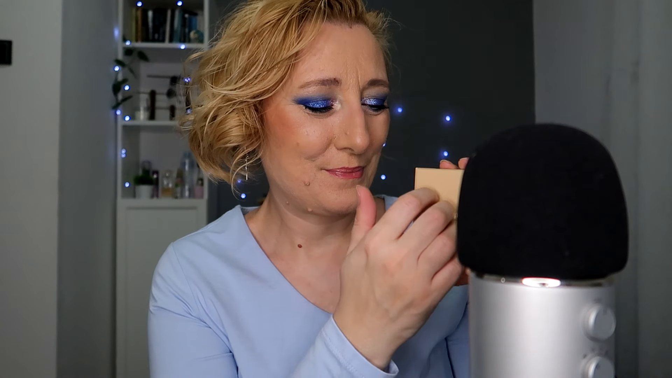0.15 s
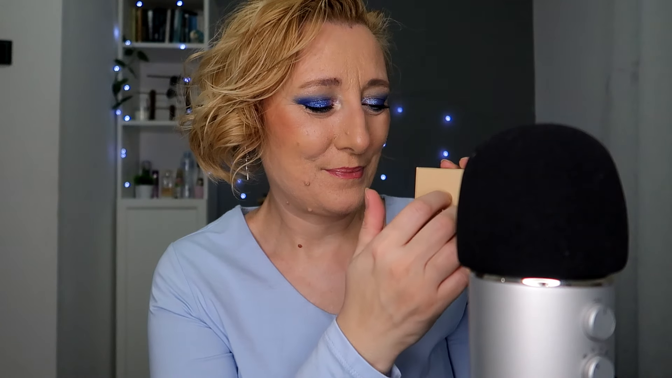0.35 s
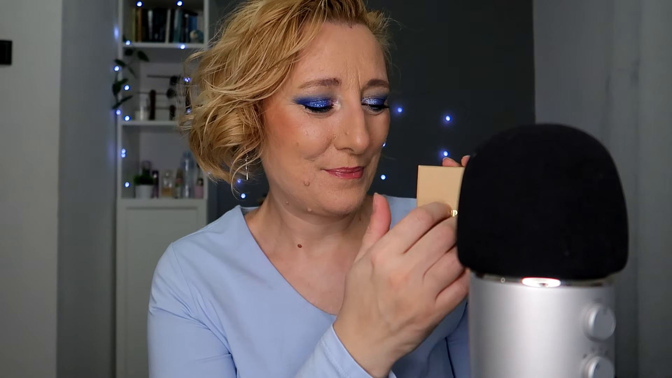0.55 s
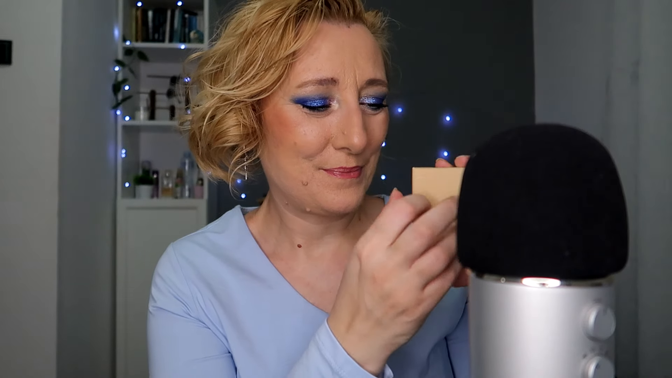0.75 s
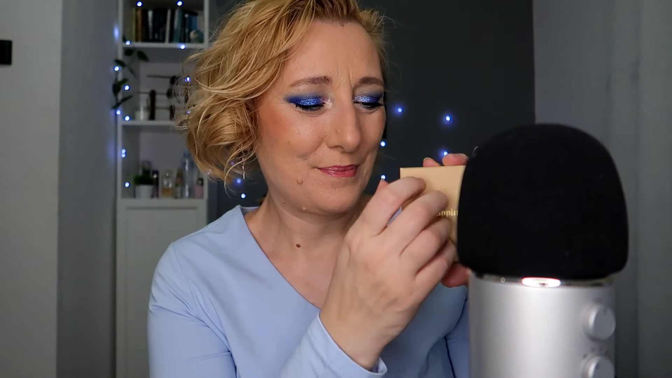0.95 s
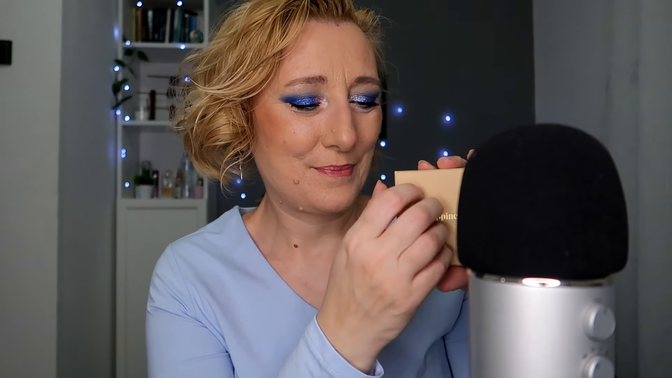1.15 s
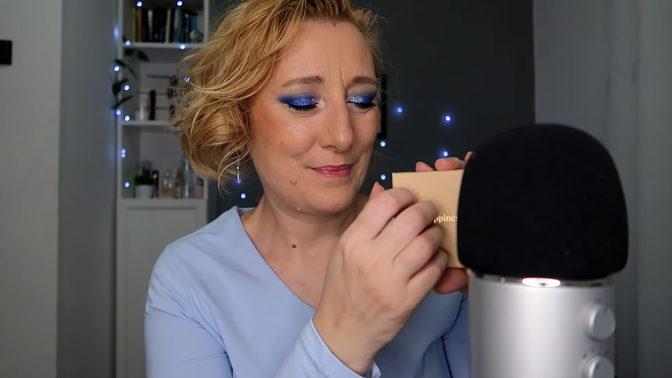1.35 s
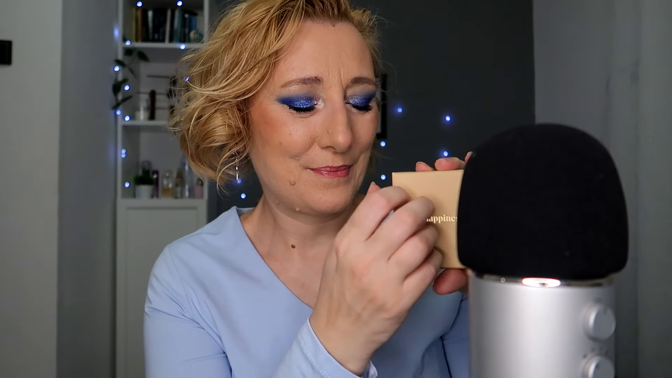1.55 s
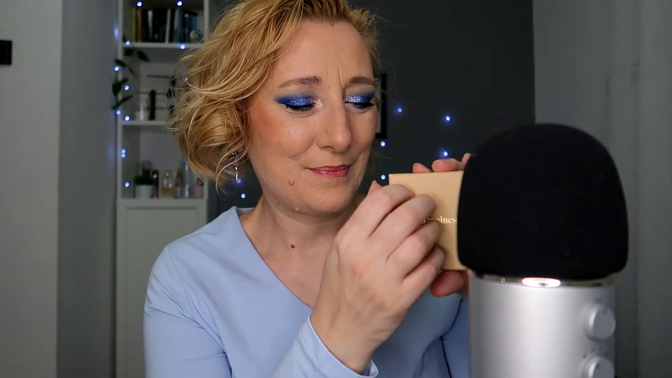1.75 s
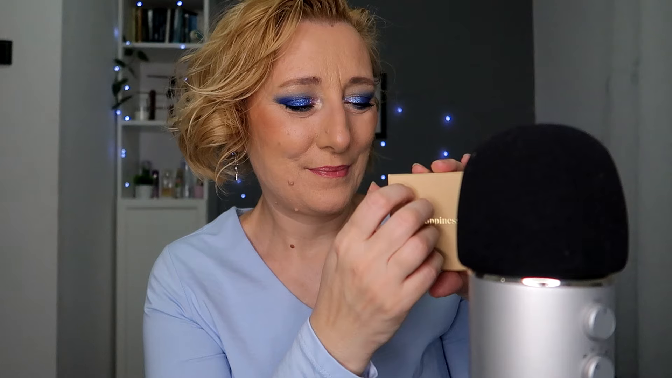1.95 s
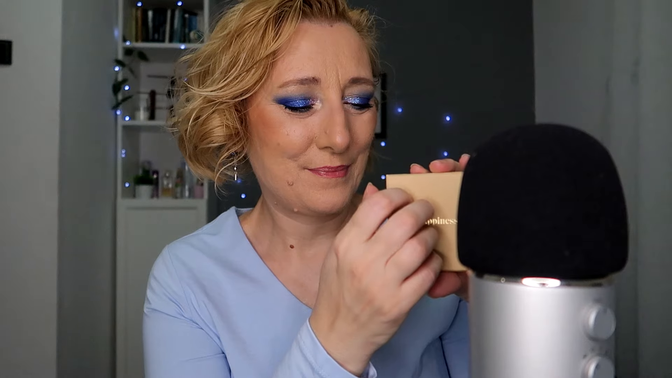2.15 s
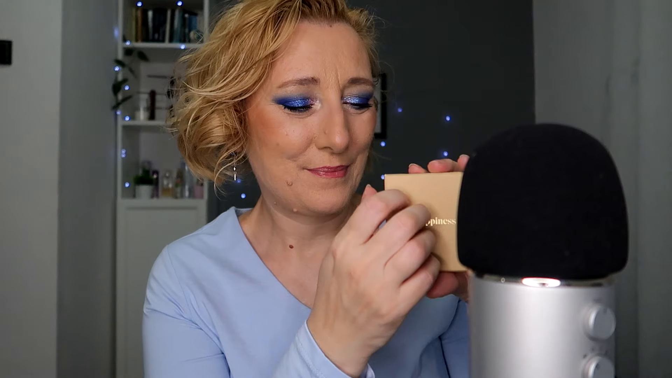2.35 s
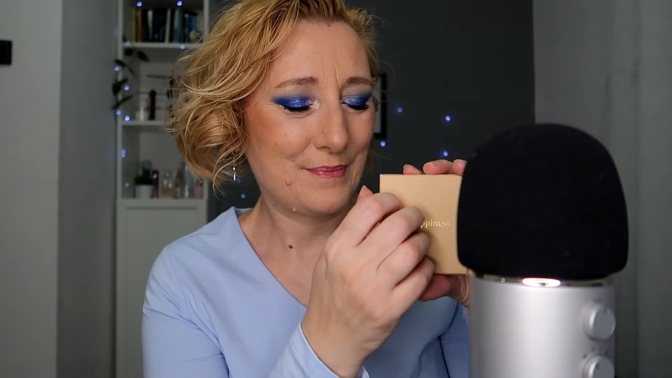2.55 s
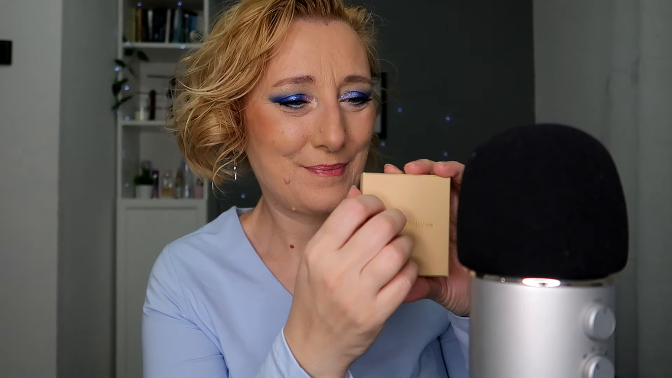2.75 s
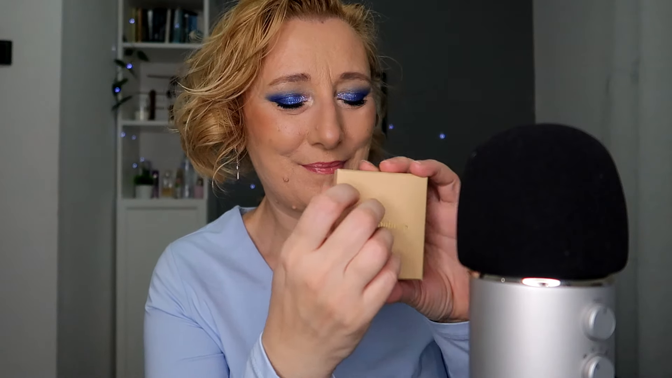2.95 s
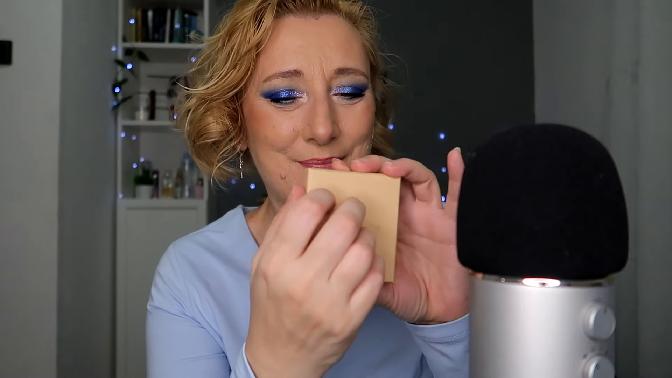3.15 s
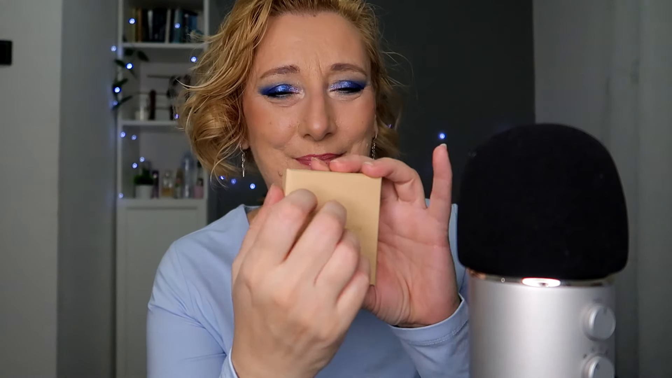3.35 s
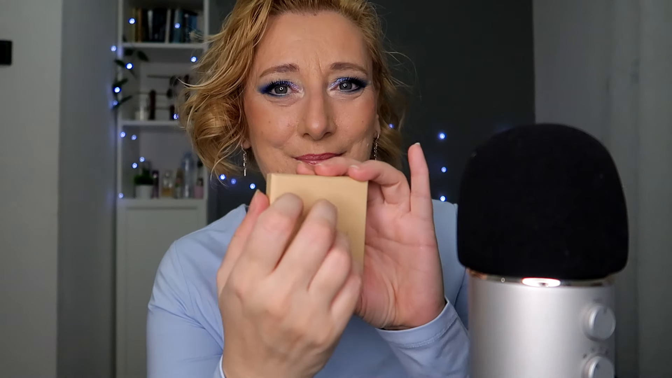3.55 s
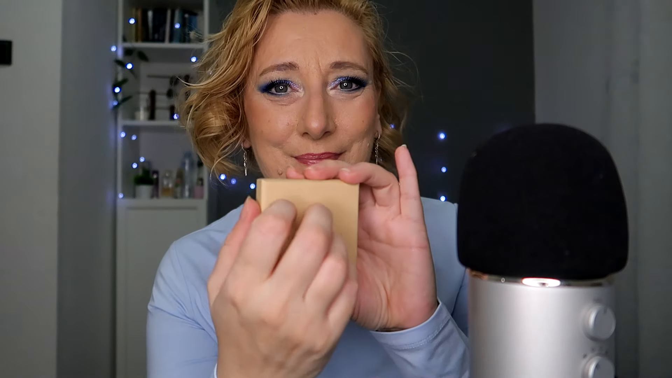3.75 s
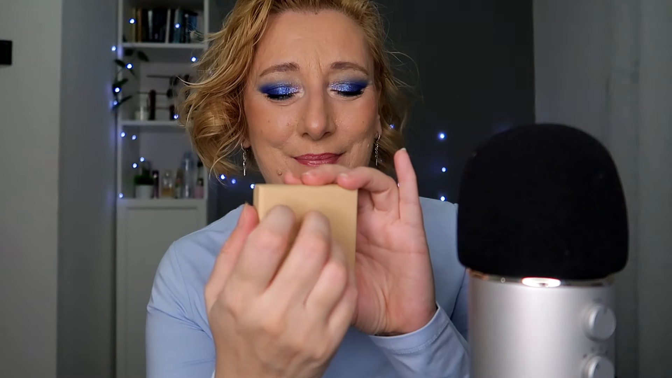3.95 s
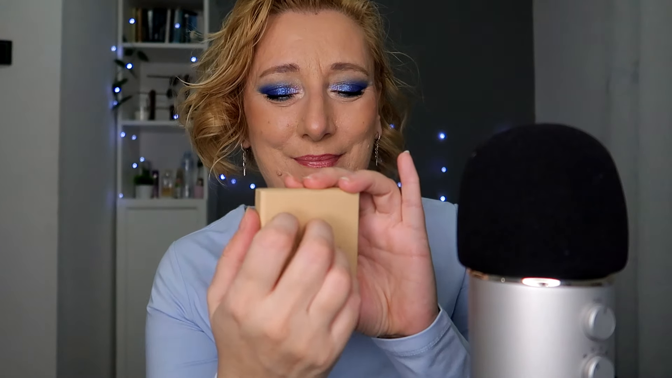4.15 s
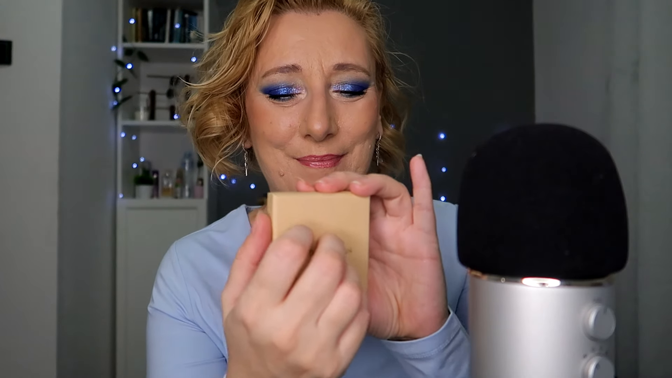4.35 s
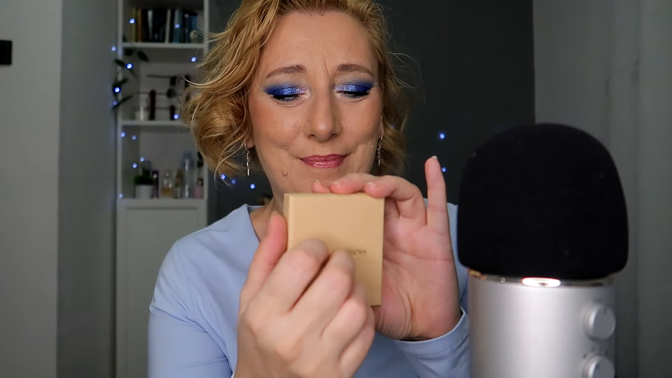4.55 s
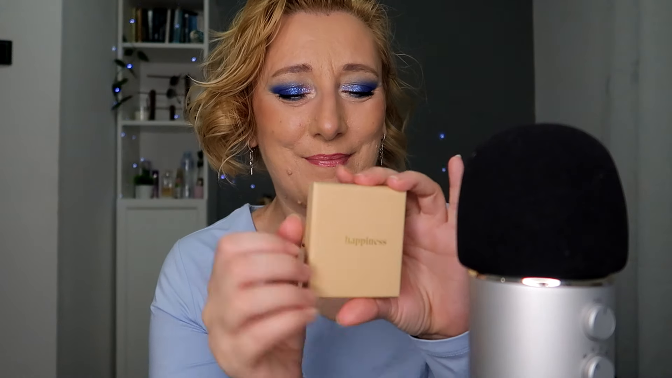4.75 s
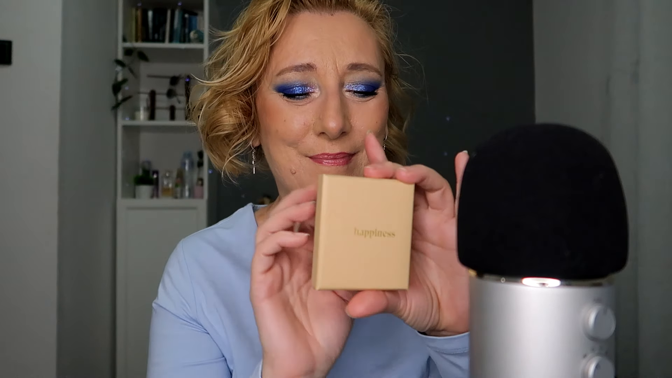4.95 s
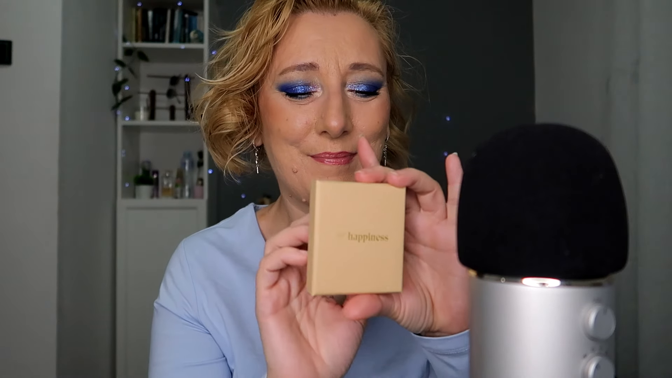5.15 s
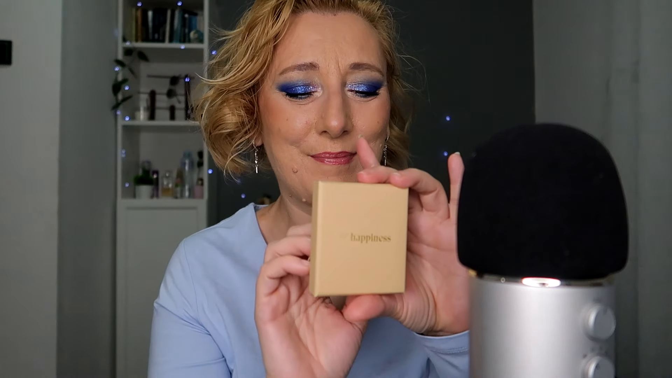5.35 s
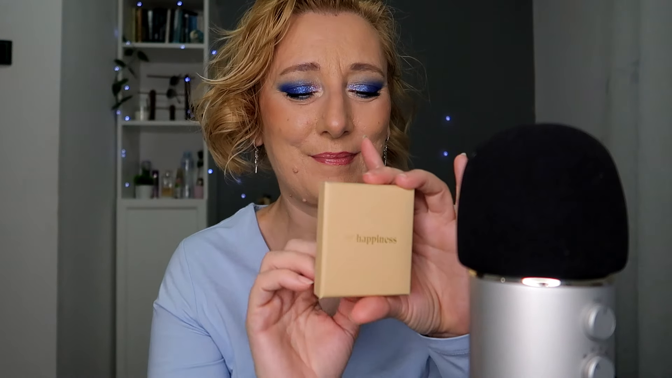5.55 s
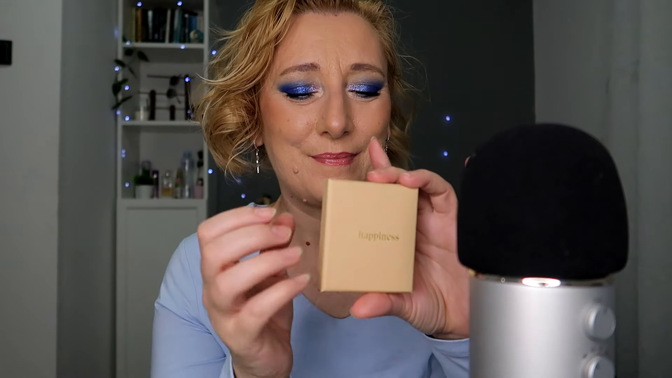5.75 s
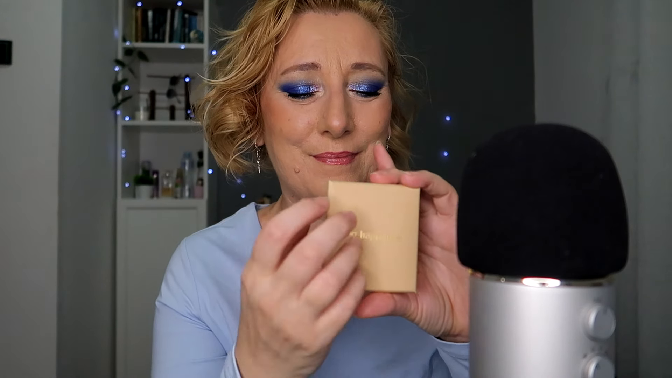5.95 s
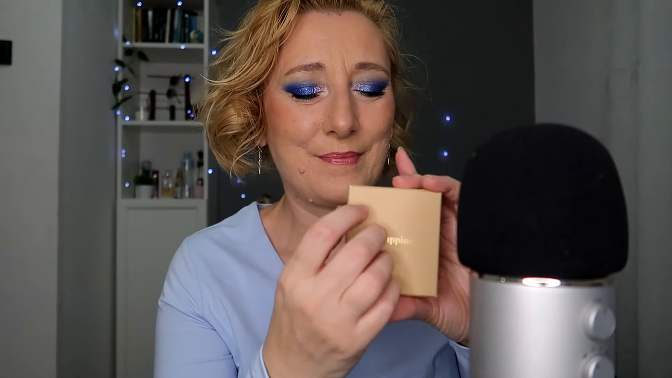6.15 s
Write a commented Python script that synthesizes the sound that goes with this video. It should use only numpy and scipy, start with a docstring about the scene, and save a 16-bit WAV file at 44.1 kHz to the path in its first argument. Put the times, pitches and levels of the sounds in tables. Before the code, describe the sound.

A small cardboard box is played by fingernails very close to a stereo microphone in a quiet, furnished room. From 0 to 0.75 s a dry, grainy scratch sits left of centre, dipping around 0.4 s and swelling near 0.66 s. After a pause, light hollow taps begin at 1.1 s in loose quick pairs, with faint papery brushes between. A sharper tap lands at 1.75 s, more follow to 2.45 s, and the loudest snaps at 2.91 s. Steady irregular tapping runs from 3.1 to 4.13 s, crossing to the right. Raspy scratching fills 4.2 to 4.76 s, with a small snag tick at 4.45 s, then a gap. At 5.13 s a soft low hand bump and weak tap lead into crisp scratching and dull finger rubbing until 5.65 s. After near silence, one hollow tap sounds at 6.05 s with slight brushes. Short echoes and faint room noise remain.

```python
"""Light, hollow taps and dry scratches of fingernails on a small cardboard box, moving from left to right.
Each tap is a blow of damped rings: the lid, a knock, a stiff wall and the nail; the box recoils in the hand.
Scratches, brushes and skids drive lid, walls and nail with a dense stream of random slips; a few snags tick.
Soft low hand bumps and finger rubs join them, with short room echoes and faint room noise behind."""
import sys
import numpy as np
from scipy import signal
from scipy.fft import rfft, irfft, next_fast_len
from scipy.io import wavfile

SR = 44100
rng = np.random.default_rng(int(sys.argv[2]) if len(sys.argv) > 2 else 0)


def generate_wav(sig):
    """Save sig (samples, or channels by samples) to the path in sys.argv[1] as 16-bit PCM at SR."""
    pcm = np.round(np.clip(np.atleast_2d(sig).T, -1, 1) * 32767).astype(np.int16)
    wavfile.write(sys.argv[1], SR, pcm)


N = 274302   # length in samples
AGE = np.arange(4096) / SR   # seconds since a blow

# nail taps: (t/s, lid level/dB, lid f/Hz, knock level/dB re lid, wall level/dB re lid,
#             nail tick level/dB re lid, nail f/Hz, wall f/Hz)
TAPS = [(1.098, -20.1, 851, 4, -4, -46, 8100.0, 2510), (1.1243, -18.5, 830, 1.2, -15.5, 3.5, 3230, 3430),
        (1.2671, -14, 933, 4.5, -2, -21, 4840, 2640), (1.3202, -19, 880, 2, -19, 0.8, 3480, 2840.0),
        (1.7243, -14.2, 810, 5, 3, -34, 8500.0, 2020), (1.7534, -4, 793, -11, -5, -12.5, 5550, 2740),
        (1.893, -12, 776, -0.5, -2.5, -16, 3300, 2130), (1.9196, -11, 896, 6.5, 3.5, -14.8, 5340, 2220.0),
        (2.0432, -21.5, 917, 5, -3, -19, 3060.0, 2500.0),
        (2.1222, -10.5, 785, -1.7, -0.5, -5.9, 4190.0, 3010),
        (2.2527, -18.5, 846, 1, -5, -7.5, 3990.0, 2530), (2.296, -15, 862, 0.2, -7, -15.5, 3860.0, 2500.0),
        (2.3931, -18.5, 920, -0.5, -8, -17, 4800, 1910), (2.4564, -11, 809, 1, -2, -3.5, 3920, 2950),
        (2.914, 0.3, 825, 0.1, -13, -4.5, 3680, 2650), (2.979, -20, 915, 2, -1.5, -15, 4130, 2660.0),
        (3.0923, -9.0, 767, -6, -4, -5, 4160.0, 2860), (3.2734, -5.5, 850, 0, -16.5, -27, 4400, 2940),
        (3.363, -11.5, 890, -1.5, -7.5, -37, 7960, 2810), (3.4384, -11, 807, -3.5, -13, -1, 2960, 2870),
        (3.6086, -7.5, 849, 0.5, -9.5, -8.5, 2970, 2540), (3.687, -13.5, 893, -10, -0.5, -18, 5780.0, 2800),
        (3.7819, -11, 830, -3.5, -2.5, -7.5, 4380, 2850), (3.9235, -13.5, 818, 0, -26, -46, 7900, 2880.0),
        (3.9644, -9.5, 862, -1.5, -8, -9, 3700, 2860.0), (4.043, -19.8, 900, 3, 1.9, -19, 4420.0, 2820.0),
        (4.1314, -13, 898, 0.5, -36, 7, 2900, 2850), (5.1332, -18.5, 894, -21, -6.5, -20, 3560, 2940.0),
        (5.3999, -20.5, 943, 10, -9.5, -35, 6750.0, 3150.0), (6.0523, -11, 759, 5.5, -2, -4.5, 3890, 1873)]
# where the nails play: (t/s, favoured lid f/Hz, left over right level/dB, hollow box rub level/dB re lid)
PLACE = [(0, 790, 4.5, -11), (0.552, 986, 5, -14.5), (1.6, 811, 3, -15), (2.72, 966, 2, -13),
         (3.099, 784, -2.5, -16), (3.6, 851, -6.5, -18), (4.45, 1028, -5.5, -12), (5.3, 1050, -2, -18),
         (6.22, 790, -2, -13)]
# the lower and the upper lid mode: (f/Hz, width/Hz)
LID_LOW = (846, 110)
LID_HIGH = (1033, 120)
# upper mode in a tap: level when the lid is struck at the lower mode's pitch, and growth on stiffer, higher spots
UPPER_MODE_DB, UPPER_MODE_DB_PER_HZ = -12.5, 0.1346
# the box pushed against the hand, re lid; both parts grow slightly with the lid pitch
SHOVE_DB, RECOIL_DB, SHOVE_DB_PER_HZ = -15, -13.5, 0.0012


def taps():
    """A nail dents the card: knock, lid, wall and nail ring as damped modes, and the box is shoved at the hand."""
    out = np.zeros((2, N))
    place_s, _, place_db, _ = np.transpose(PLACE)
    for s, level_db, lid_hz, knock_db, wall_db, tick_db, nail_hz, wall_hz in TAPS:
        stiffer_hz = lid_hz - LID_LOW[0]
        upper_db = UPPER_MODE_DB + UPPER_MODE_DB_PER_HZ * stiffer_hz
        push_db = SHOVE_DB_PER_HZ * stiffer_hz

        lid = ring(lid_hz, width_hz=138) + from_db(upper_db) * ring(*LID_HIGH)
        lid = cut(lid, hz=207, kind="high", order=1)
        shove = from_db(SHOVE_DB + push_db) * ring(hz=544, width_hz=190)
        body = cut(lid + shove, hz=4400, kind="low")

        # the held box recoils slowly, further to the right than the tap
        recoil = cut(ring(hz=108, width_hz=200), hz=61, kind="high")
        recoil = from_db(RECOIL_DB + push_db) * recoil * panned(pan_db=-13.5)
        knock = from_db(knock_db) * ring(hz=1660, width_hz=1210)
        wall = from_db(wall_db) * ring(wall_hz, width_hz=685)

        # one sharp spike and a brief ring
        nail = 1.8 * (AGE == 0) + ring(nail_hz, width_hz=1300, wave=np.cos)
        # the nail flexes and touches again within a millisecond, notching the tick
        nail = nail + 0.13 * np.roll(nail, round(0.0004 * SR))
        nail = cut(nail, hz=2770, kind="high", order=1)
        # the higher the nail's pitch, the further up its tick reaches
        tick = from_db(tick_db) * cut(nail, nail_hz ** 2 / 2900, "low", order=4)

        blow = scattered(body - knock + wall + tick, above_hz=1600, share_db=-4.5)
        pan = panned(np.interp(s, place_s, place_db))
        add(out, s, -from_db(level_db) * (blow + recoil) * pan)
    return out


def scattered(blow, above_hz, share_db):
    """The treble of a blow scatters briefly through the card, differently to each port."""
    tails = rng.standard_normal((2, len(AGE))) * np.exp(-AGE / 0.0031)
    tails /= np.linalg.norm(tails, axis=1, keepdims=True)
    treble = cut(blow, above_hz, "high")
    return blow + from_db(share_db) * signal.fftconvolve(treble[None], tails, axes=-1)[:, :len(AGE)]


# resonances of the box walls: (f/Hz, width/Hz, level/dB)
WALLS = [(1220, 500, 8), (1416, 140, 7.5), (1820, 1500, -9.5)]
# resonances of the nail on the card: (f/Hz, width/Hz, level/dB)
NAIL = [(4030, 740, -2), (5150, 1600, 8.5), (6400, 400, -9), (7800, 780, -4.5), (8900, 200, -8.5),
        (12600, 1800, -6.5)]
# the grip of the holding hand tunes one wall: (t/s, wall f/Hz, its ring level/dB re rasp)
GRIP = [(0.2, 2040, -4), (0.3, 3130, -7), (0.72, 2097, -12), (1.1, 2425, -6), (2.722, 2263, -8.5),
        (4.281, 2790, -5.5), (4.55, 2170, -14), (5.2, 2123, -11.5)]
# the nail's angle sets its free edge and its top: (t/s, edge f/Hz, ring level/dB re hiss, top modes gain/dB)
TILT = [(0.1, 5030, -14, 0), (0.55, 4900, -3, 4), (0.7, 4500, -21, 4.5), (1.48, 5160, 4.5, -6.5),
        (1.7, 5200, -13.5, 5), (3.1, 5920, -4.5, 0.5), (4.25, 5110, -17, -1), (4.62, 5920, -2, 5.5),
        (4.75, 7800, 0.5, 7), (5.2, 4230, -3.5, 0), (6.1, 4566, -7, 5.5)]
WANDER_HZ = 59.7   # spread of the favoured lid pitch as the nails change place
CATCHES_PER_S, CATCH_DB = 69, -11.5   # sparser snags on coarser fibres, level re the main slips
PORTS_DB = 0.7   # spread of each mode's level, opposite at the two ports


def scratches():
    """Sliding nails drive lid, walls and nail; place, grip and tilt pick what rings."""
    level_db, rasp_db, hiss_db = sliding()
    favoured_hz, pan_db, hollow_db = in_time(PLACE)
    wall_hz, wall_db = in_time(GRIP)
    edge_hz, edge_db, top_db = in_time(TILT)

    catches = from_db(CATCH_DB) * slips(per_s=CATCHES_PER_S, size_db=1.5)
    force = slips(per_s=2100, size_db=1.5) + catches
    second_nail = slips(per_s=2600, size_db=3.5)
    apart = slips(per_s=2400, size_db=6.0)   # feeds the difference between the ports

    # a higher favoured pitch hands power from the lower to the upper lid mode
    upper = np.clip((favoured_hz + WANDER_HZ * drift(rate=20) - 790) / 290, 0.05, 0.9)
    low_mode = np.sqrt(1 - upper) * driven(force, ring(*LID_LOW))
    high_mode = np.sqrt(upper) * driven(second_nail, ring(*LID_HIGH))
    lid_side = driven(apart, ring(hz=900, width_hz=500))
    lid = stereo(rms_one(low_mode + high_mode), lid_side, side_db=-16.0)
    lid = cut(lid, hz=1940, kind="low")
    lid = rms_one(cut(lid, hz=570, kind="high", order=3))
    hollow = rms_one(cut(stereo(second_nail, apart, side_db=-9.5), hz=[250, 520], kind="band"))
    lid = lid + from_db(hollow_db) * hollow

    # the many close modes of the card ripple the treble
    rippled = driven(force, smear(share_db=-9, decay_s=.005))
    on_walls = stereo(rippled, apart, side_db=-28.0)
    on_nail = stereo(rippled, apart, side_db=-7.0)

    walls = driven(on_walls, modal(WALLS, edges_hz=[1000, 2700], ports_db=PORTS_DB))
    walls = hand_echo(cut(walls, hz=2550, kind="low", order=8))
    walls = walls + from_db(wall_db) * gliding(on_walls, wall_hz, width_hz=450)

    hiss = driven(on_nail, modal(NAIL, edges_hz=[3000, 15000], ports_db=PORTS_DB))
    # the nail's angle lifts or lowers its highest modes
    top = signal.sosfiltfilt(signal.butter(6, 6700, "high", fs=SR, output="sos"), hiss)
    hiss = hand_echo(hiss + top * (from_db(top_db) - 1))
    edge_force = stereo(second_nail, apart, side_db=-19.5)
    hiss = hiss + from_db(edge_db) * gliding(edge_force, edge_hz, width_hz=1200)

    # sticking and slipping make rasp and hiss flutter together
    flutter = from_db(1.3 * drift(rate=180))
    # each nail tilts as it slides, so rasp and hiss swell on their own
    walls = walls * flutter * from_db(1.0 * drift(rate=44))
    hiss = hiss * flutter * from_db(0.88 * drift(rate=33))

    pressure = from_db(level_db + 0.26 * drift(rate=110))   # the pressure of the nail is unsteady
    mix = from_db(-1.5) * lid + from_db(rasp_db - 9.0) * walls + from_db(hiss_db - 4.5) * hiss
    return pressure * mix * panned(pan_db)


# three long scratches, one curve each, before the mix trims in scratches():
# (t/s, lid level/dB, wall rasp level/dB re lid, nail hiss level/dB re lid)
SCRATCHES = [
    [(0.0, -37, -7.5, -21.5), (0.068, -38, -1.5, -13), (0.122, -23, -10.5, -21.5), (0.136, -31, -3, -11.5),
     (0.37, -44, 0, -25.5), (0.545, -31.5, 8, -13.5), (0.615, -27, 2, -16.5), (0.66, -21, 0.5, -13),
     (0.724, -26, 3, -11.5), (0.75, -42.5, -7, -15)],
    [(4.15, -49, 3, -15), (4.25, -24.5, 2.5, -13.5), (4.356, -40, 6, -12), (4.475, -25, 6, -11),
     (4.56, -26.5, 1, -16), (4.68, -23.5, 3.5, -13.5), (4.748, -17.5, 2.5, -10), (4.758, -39.5, -15, -4.5),
     (4.8, -60, 5, 9.5)],
    [(5.15, -39, -2.5, -12), (5.18, -25, -2.5, -16), (5.243, -30, -7.5, -21), (5.258, -27, -0.5, -22.5),
     (5.322, -25, -1.5, -23.5), (5.385, -31, -3.5, -20.5), (5.472, -21.5, 2.5, -18.5),
     (5.512, -30.5, 5, -20), (5.546, -23, 3, -18.5), (5.598, -20, 7.5, -6.5), (5.65, -38, -3.5, -1.5)],
]
LIFT_DB_PER_S = 697   # fade as the nails meet or leave the card
# short brushes of the nails, before the same trims:
# (peak t/s, swell t/s, fade t/s, lid level/dB, wall rasp level/dB re lid, nail hiss level/dB re lid)
BRUSHES = [(1.17, 0.046, 0.23, -45.5, -1.5, -23), (1.38, 0.045, 0.034, -38, -0.5, -18.5),
           (1.485, 0.055, 0.056, -33.5, -4, -16), (1.69, 0.083, 0.038, -26.5, -9.5, -33),
           (2.674, 0.039, 0.037, -31, 2.5, -24.5), (2.756, 0.058, 0.019, -34, 1.5, -20),
           (2.872, 0.018, 0.021, -30, -5, -13.5), (3.006, 0.024, 0.056, -39, -1, -27),
           (3.136, 0.048, 0.017, -32.5, -7.5, -16.5), (6.069, 0.015, 0.044, -26, -9, -21.5),
           (6.16, 0.019, 0.037, -39.5, -10, -25)]
BRUSH_DEPTH_DB, BRUSH_SHAPE = 13.5, 1.52   # drop over one swell or fade time; 1 = pointed, 2 = rounded
# a faint nail skid peaks just after every tap: its delay, then swell, fade and levels as in a brush
SKID_DELAY_S, SKID_SWELL_S, SKID_FADE_S = 0.0083, 0.019, 0.025
SKID_DB, SKID_RASP_DB, SKID_HISS_DB = -44, -1.5, -26.5


def sliding():
    """Add the power of all strokes: lid level, and rasp and hiss re lid, in dB sample by sample."""
    t = np.arange(0, N / SR, .001)
    strokes = []
    for curve in SCRATCHES:
        s, *columns = np.transpose(curve)
        level_db, rasp_db, hiss_db = [np.interp(t, s, c) for c in columns]
        lifted_s = np.abs(t - np.clip(t, s[0], s[-1]))   # time outside the stroke
        strokes.append((level_db - LIFT_DB_PER_S * lifted_s, rasp_db, hiss_db))
    skids = [(s + SKID_DELAY_S, SKID_SWELL_S, SKID_FADE_S, SKID_DB, SKID_RASP_DB, SKID_HISS_DB)
             for s, *_ in TAPS]
    for s, swell_s, fade_s, level_db, rasp_db, hiss_db in BRUSHES + skids:
        away = np.abs((t - s) / np.where(t < s, swell_s, fade_s))
        strokes.append((level_db - BRUSH_DEPTH_DB * away ** BRUSH_SHAPE, rasp_db, hiss_db))
    power = sum(from_db([level, level + rasp, level + hiss]) ** 2 for level, rasp, hiss in strokes)
    lid_db, walls_db, nail_db = 10 * np.log10(power + 1e-14)
    return in_time(np.transpose([t, lid_db, walls_db - lid_db, nail_db - lid_db]))


# colour of the slips on the grain of the card: (f/Hz, level/dB)
GRAIN = [(60, -11), (200, -6.5), (400, -3), (800, 15), (1300, 3.5), (2000, 5.5), (3000, 3.5), (5000, -10.5),
         (16000, -20)]


def slips(per_s, size_db):
    """The nail catches and lets go of paper fibres: random clicks of uneven size and either sign; rms 1."""
    sizes = from_db(size_db * np.minimum(rng.exponential(1, N), 4)) * rng.choice([-1, 1], N)
    happens = rng.random(N) < per_s / SR
    return rms_one(coloured(sizes * happens, GRAIN))


# sound bounces between the card and the moving fingers: middle delay, spread of its log, level of the echo
HAND_ECHO_S, HAND_ECHO_SWING, HAND_ECHO_DB = 0.000966, 0.18, -10.5


def hand_echo(x):
    """A reflection off the moving fingers combs the sound with shifting bands."""
    now = np.arange(N)
    lag = SR * HAND_ECHO_S * np.exp(HAND_ECHO_SWING * drift(rate=5.0))
    return x + from_db(HAND_ECHO_DB) * np.array([np.interp(now - lag, now, port) for port in x])


# the nail snags on a coarse spot of the card and lets go: (t/s, level/dB)
SNAGS = [(1.5507, -37.5), (4.185, -39), (4.452, -26), (5.358, -38), (5.387, -40.5)]


def snags():
    """A snagged nail snaps free: a dry high tick with a ring of the upper lid mode."""
    out = np.zeros((2, N))
    place_s, _, place_db, _ = np.transpose(PLACE)
    tick = cut(ring(hz=4500, width_hz=3500, wave=np.cos), hz=2500, kind="high", order=1)
    tick = tick + from_db(4.5) * ring(*LID_HIGH)
    for s, level_db in SNAGS:
        add(out, s, from_db(level_db) * tick * panned(np.interp(s, place_s, place_db)))
    return out


# the pads of the fingers dragging on the box, before their random swells: (t/s, level/dB)
PADS = [(5.11, -90.5), (5.15, -56.5), (5.6, -49), (5.68, -90.5)]


def pads():
    """Skin drags on the card with a soft, low rub: band-limited noise with an unsteady level."""
    level_db, = in_time(PADS)
    rub = cut(stereo(*rng.standard_normal((2, N)), side_db=-8.5), hz=[120, 280], kind="band")
    return from_db(level_db + 6.2 * drift(rate=26)) * rms_one(rub) * panned(pan_db=-13.5)


# soft bumps of the hands: (t/s, peak level/dB, mean of both ports)
BUMPS = [(5.129, -25), (5.152, -39), (5.217, -34), (6.188, -46)]


def bumps():
    """Finger pads give slow, dull pushes: a heavily damped low mode of slightly random pitch."""
    out = np.zeros((2, N))
    for s, peak_db in BUMPS:
        push_hz = 62 * np.exp(.15 * rng.standard_normal())
        push = cut(ring(push_hz, width_hz=220), hz=222, kind="low")
        add(out, s, from_db(peak_db) * push / np.abs(push).max() * panned(pan_db=-18.0))
    return out


# time for the room to fall by 60 dB: (f/Hz, decay t/s)
ROOM_T60 = [(200, 0.35), (530, 0.3), (3700, 0.2843), (10000, 0.1)]
# colour of the room echoes: (f/Hz, level/dB)
ROOM_COLOUR = [(400, -15.5), (900, -14.5), (3000, -18)]


def room(x):
    """Echoes of a small furnished room: bands of noise, each dying at its own rate."""
    age = np.arange(SR // 2) / SR
    noise = stereo(*rng.standard_normal((2, len(age))), side_db=-6.0)
    edges = np.geomspace(60, 17000, 9)
    onset = np.clip((age - .003) / 0.012, 0, 1)
    tail = 0
    for low, high in zip(edges, edges[1:]):
        centre_hz = np.sqrt(low * high)
        fade = from_db(-60 * age / at_hz(ROOM_T60, centre_hz)) * onset
        band = cut(noise, [low, high], "band", order=3)
        tail = tail + from_db(at_hz(ROOM_COLOUR, centre_hz)) * band * fade / np.sqrt(np.sum(fade ** 2))
    return signal.fftconvolve(x, tail, axes=-1)[:, :N]


# colour of the still room, relative: (f/Hz, level/dB)
FLOOR = [(30, -11), (55, -14), (560, -32.5), (889, -28), (3670, -43), (16000, -50.5)]
FLOOR_DB = -62   # rms of the room noise


def still_air():
    """Faint steady room noise, coloured and nearly independent at the two ports."""
    noise = stereo(*rng.standard_normal((2, N)), side_db=-1.5)
    return from_db(FLOOR_DB) * rms_one(coloured(noise, FLOOR))


def ring(hz, width_hz, wave=np.sin):
    """One damped mode after a blow; a wider resonance dies sooner."""
    return np.exp(-np.pi * abs(width_hz) * AGE) * wave(2 * np.pi * hz * AGE)


def driven(force, response):
    """A body's answer to a running force; rms 1."""
    answer = signal.fftconvolve(np.atleast_2d(force), np.atleast_2d(response), axes=-1)
    return rms_one(answer[:, :N])


def smear(share_db, decay_s):
    """An impulse followed by a short diffuse tail; unit energy."""
    tail = rng.standard_normal(len(AGE)) * np.exp(-AGE / abs(decay_s))
    kernel = from_db(share_db) * tail / np.linalg.norm(tail)
    kernel[0] = 1
    return kernel / np.linalg.norm(kernel)


def modal(modes, edges_hz, ports_db):
    """Response of a set of modes, each heard a little differently by the two ports; peak of the mean 1."""
    chance_db = ports_db * rng.standard_normal(len(modes)) * np.array([[1], [-1]])
    rings = np.array([width * from_db(db) * ring(hz, width, np.cos) for hz, width, db in modes])
    sound = cut(from_db(chance_db) @ rings, edges_hz, "band", order=2)
    return sound / np.abs(sound.mean(axis=0)).max()


def gliding(force, hz, width_hz):
    """A resonance whose pitch moves: shift it to 0 Hz, low-pass, shift back; rms 1."""
    turn = np.exp(2j * np.pi * np.cumsum(hz) / SR)
    return rms_one((turn * cut(force / turn, abs(width_hz) / 2, "low")).real)


def from_db(db):
    """Decibels to gain."""
    return 10 ** (np.asarray(db) / 20)


def rms_one(x):
    """Scale to unit rms."""
    return x / np.sqrt(np.mean(x ** 2) + 1e-20)


def in_time(rows):
    """The columns of a curve, sample by sample."""
    s, *columns = np.transpose(rows)
    return [np.interp(np.arange(N) / SR, s, c) for c in columns]


def at_hz(points, hz):
    """Read a table on a log-frequency axis."""
    f, value = np.transpose(points)
    return np.interp(np.log(np.maximum(hz, 1)), np.log(f), value)


def coloured(x, spectrum):
    """Give a sound the colour of an (f/Hz, level/dB) table."""
    size = next_fast_len(x.shape[-1])
    gain = from_db(at_hz(spectrum, np.fft.rfftfreq(size, 1 / SR)))
    return irfft(rfft(x, size) * gain, size)[..., :x.shape[-1]]


def cut(x, hz, kind, order=2):
    """Butterworth filter."""
    sos = signal.butter(order, np.minimum(hz, SR / 2 - 100), kind, fs=SR, output="sos")
    return signal.sosfilt(sos, x)


def drift(rate):
    """A random curve with rms 1, drawn through the given number of points per second."""
    knots = np.arange(N) * rate / SR
    return rms_one(np.interp(knots, np.arange(4096), rng.standard_normal(4096)))


def panned(pan_db):
    """Left and right gains for a level difference; positive leans left, mean gain 1."""
    gains = from_db(np.array([pan_db, -pan_db]) / 2).reshape(2, -1)
    return gains / gains.mean(axis=0)


def stereo(mid, side, side_db):
    """Two channels from a common part and an opposed part."""
    return mid + from_db(side_db) * side * np.array([[1], [-1]])


def add(out, s, sound):
    """Mix a stereo sound in at a time."""
    start = int(np.clip(round(s * SR), 0, N - 1))
    out[:, start:start + sound.shape[-1]] += sound[:, :N - start]


def scene():
    """The box close up, its room echoes and the room noise."""
    box = taps() + scratches() + snags() + pads() + bumps()
    box = cut(box, hz=41, kind="high", order=3)
    return box + room(box) + still_air()


CUTOFF_HZ = 16200


def record(dry):
    """Peaks are clipped at full scale, then a steep low-pass cuts the top."""
    limited = np.clip(dry, -1, 1)
    return signal.sosfilt(signal.ellip(10, .1, 80, CUTOFF_HZ, fs=SR, output="sos"), limited)


dry = scene()
out = record(dry)
generate_wav(out)
```